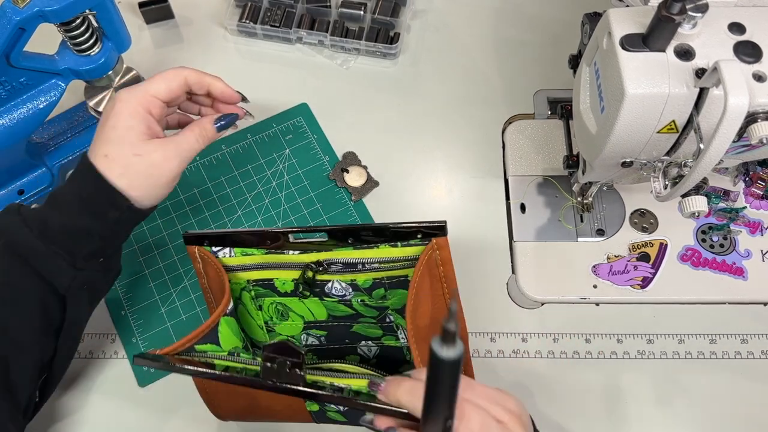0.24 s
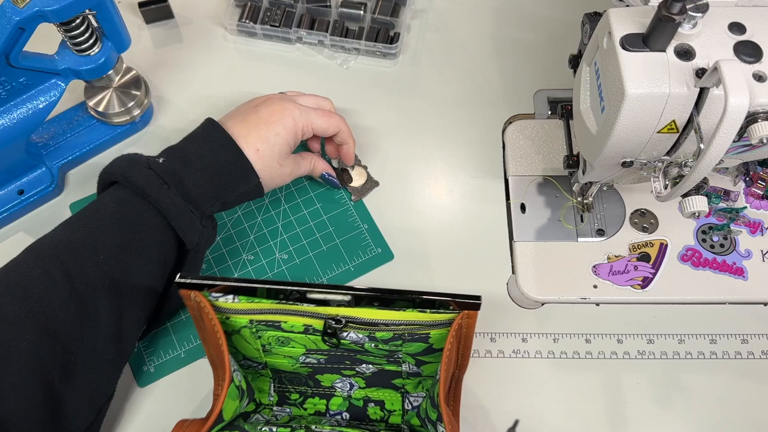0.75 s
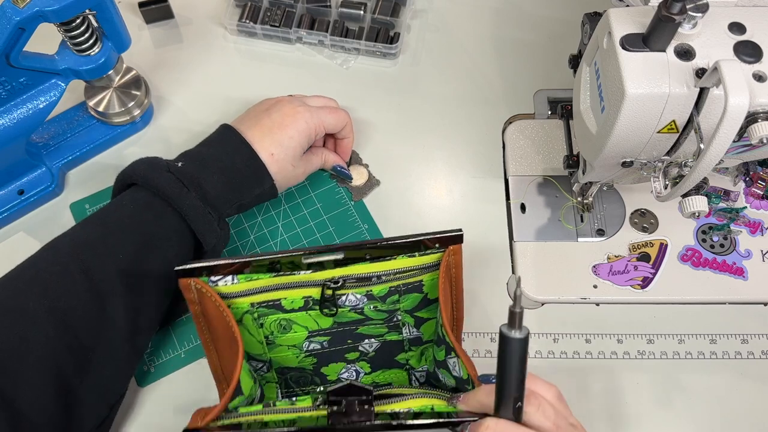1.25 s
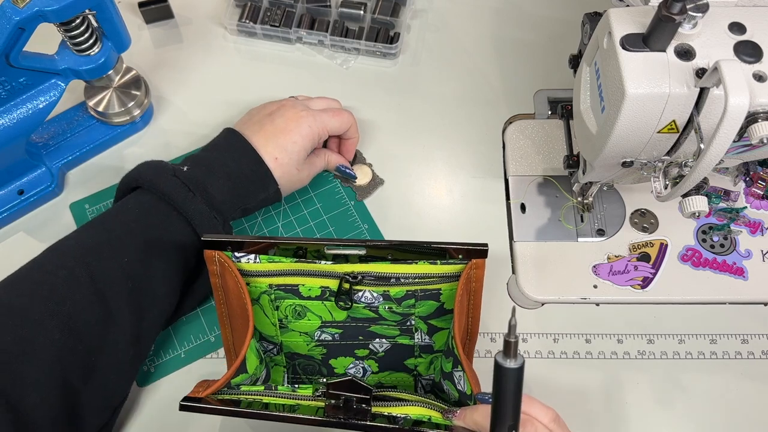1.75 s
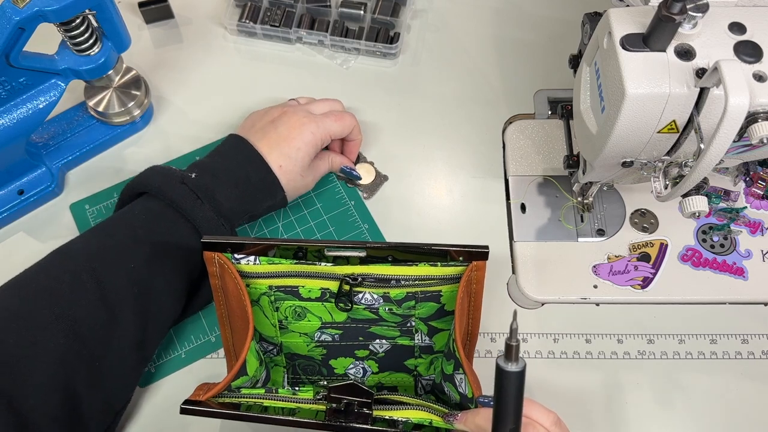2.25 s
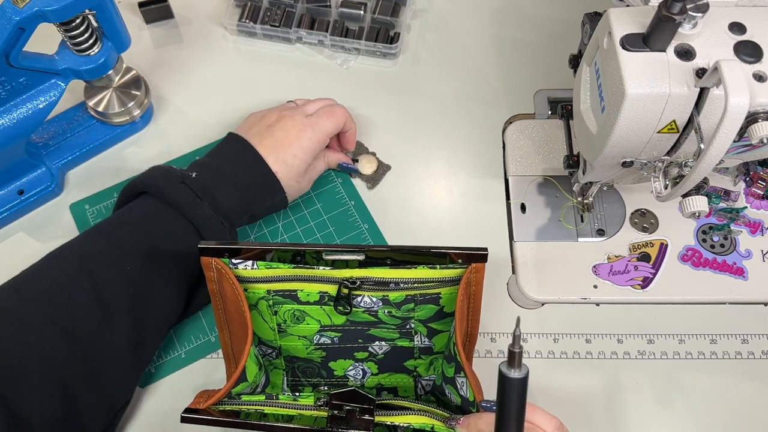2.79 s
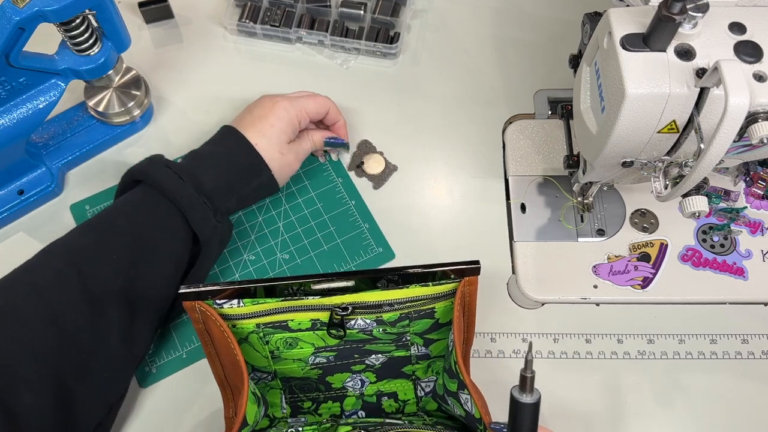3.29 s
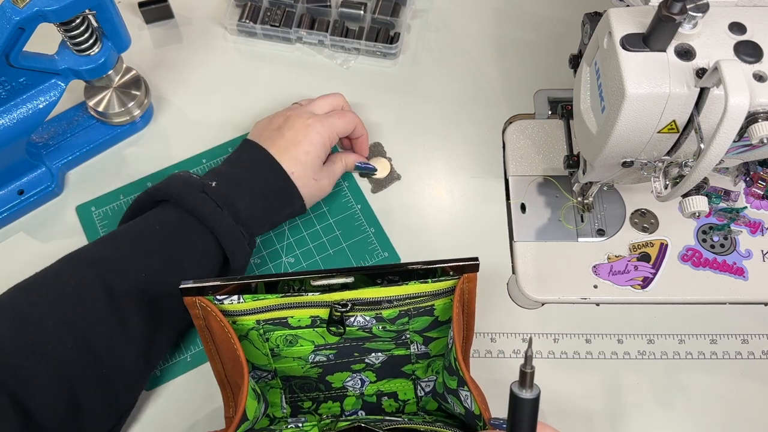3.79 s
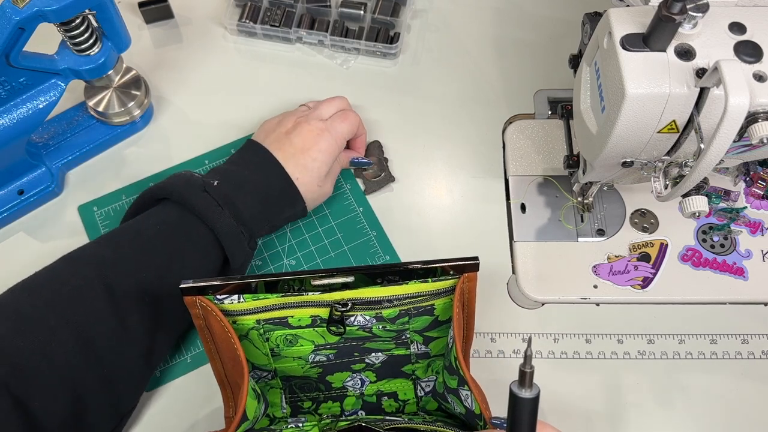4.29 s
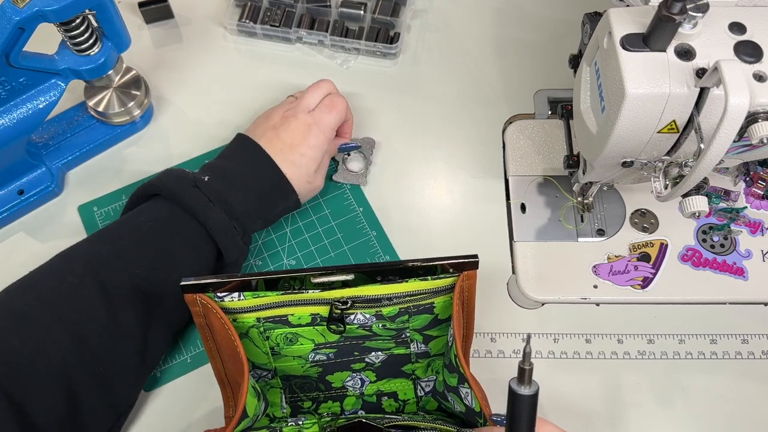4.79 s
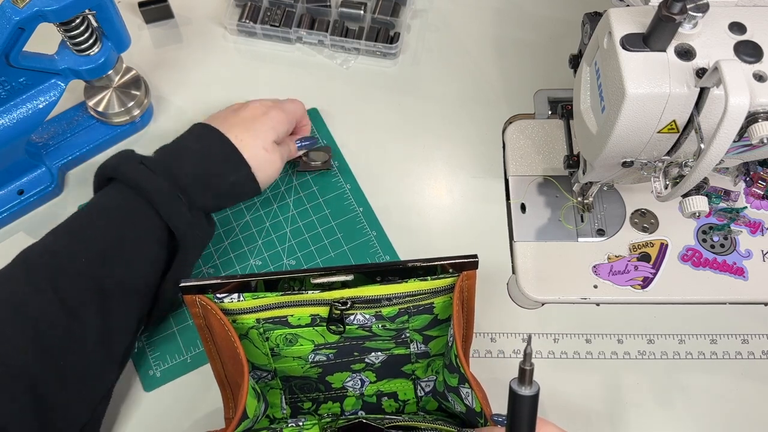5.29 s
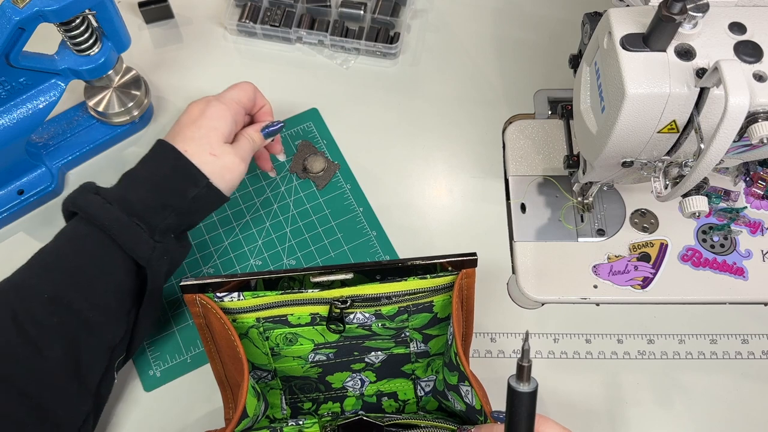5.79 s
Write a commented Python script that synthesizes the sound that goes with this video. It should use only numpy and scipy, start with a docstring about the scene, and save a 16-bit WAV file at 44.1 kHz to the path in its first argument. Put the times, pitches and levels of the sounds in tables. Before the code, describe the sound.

Sparse metallic clicks, tiny squeaks and soft cloth brushing at a table in a quiet, faintly humming room, then a sharp cluster of clacks.

```python
"""In a small room, at a work table, a hand holds a screwdriver against a bag's metal frame; the other pries a plate.
Metal snaps down, bounces, rings briefly and ends in a loud clatter: shaped noise bursts plus fading sine waves.
Nails tick (light bursts), scrape (narrow noise in small slips) and squeak (gliding tones); low noise thuds dully.
A sleeve brushes the cutting mat as swelling noise; the room answers with a short noise tail.
Behind it all lie soft air noise and a faint hum of unsteady sine waves."""
import sys
import numpy as np
from scipy import signal
from scipy.fft import rfft, irfft, next_fast_len
from scipy.io import wavfile
from scipy.ndimage import uniform_filter1d, map_coordinates

SR = 44100
rng = np.random.default_rng(int(sys.argv[2]) if len(sys.argv) > 2 else 0)


def inscribe(sig):
    """Save sig as 16-bit PCM at rate SR to the path in sys.argv[1].

    A 1-D sig is mono; a 2-D sig holds one channel per row.
    Samples are clipped to [-1, 1] before scaling.
    """
    pcm = np.round(np.clip(np.atleast_2d(sig).T, -1, 1) * 32767)
    wavfile.write(sys.argv[1], SR, pcm.astype(np.int16))


N = 266364  # length of the scene [samples]


def amp(db):
    """Turn decibels into a factor for the wave."""
    return 10 ** (np.asarray(db) / 20)


def unit(x):
    """Scale to an average strength (rms) of 1."""
    return x / np.sqrt(np.mean(x ** 2) + 1e-20)


def along(points, hz):
    """Read a curve of (frequency, value) points, spaced by pitch as the ear hears it."""
    point_hz, value = np.transpose(points)
    return np.interp(np.log(hz + 1), np.log(point_hz + 1), value)


def wobble(rate):
    """A smooth random curve with `rate` random points a second."""
    points = rng.standard_normal(int(N * rate / SR) + 4)
    return map_coordinates(points, [np.arange(N) * rate / SR])


def filtered(x, response):
    """Make each frequency stronger or weaker, or shift its phase."""
    n = x.shape[-1]
    padded = next_fast_len(n + 4096)
    spectrum = rfft(x, padded) * response(np.fft.rfftfreq(padded, 1 / SR))
    return irfft(spectrum, padded)[..., :n]


def causal(gain):
    """Turn a gain curve into the filter that reacts soonest, with nothing before the blow (minimum phase)."""
    cepstrum = irfft(np.log(np.maximum(gain, 1e-6)))
    half = len(cepstrum) // 2
    cepstrum[1:half] *= 2
    cepstrum[half + 1:] = 0
    return irfft(np.exp(rfft(cepstrum)))


def add(track, s, x):
    """Mix a sound into the track at time s."""
    i = max(round(s * SR), 0)
    track[..., i:i + x.shape[-1]] += x[..., :max(N - i, 0)]


def narrow(n, hz, width):
    """Noise of rms 1 gathered around one pitch."""
    return unit(filtered(rng.standard_normal(n), lambda f: 1 / (1 + (np.log((f + 1) / hz) / width) ** 2)))


def modes(rows, t, weights_db):
    """Objects ring as a sum of fading sine waves, each with its own strength."""
    hz, db, t60 = np.transpose(rows)[:, :, None]
    phase = rng.uniform(0, 2 * np.pi, hz.shape)
    fade = amp(db + weights_db[:, None] - 60 * t / t60)
    return np.sum(fade * np.sin(2 * np.pi * hz * t + phase), 0)


# Small metal piece, damped by the fingers:
# (frequency [Hz], relative level [dB], time to fade by 60 dB [s], spot that excites it most [0-2])
METAL_RING = [(5670, 5.5, 0.022, 0.18), (5800, 3.5, .027, 0), (7280, 5, 0.026, 1.32),
              (10600, 2, 0.038, 1.66)]
# Metal snaps down on the table; small trims follow:
# (time [s], level [dB], pitch [Hz], hardness [dB], time to fade by 60 dB [s], metal ring re snap level [dB],
#  spot struck [0-2], time to first bounce [s; 2.5 ms or less: no bounce], loss per bounce [dB])
METAL_SNAPS = [(0.9385, -28, 3730, -13.5, 0.02, -15, 1.3, .0072, 4.5),
               (1.4385, -30, 3500, -16, 0.039, -10, 1.4, 0.01, 3),
               (2.043, -37.5, 4007, -21, 0.032, -18, 1.6, 0, 0),
               (2.2797, -37.5, 1760, -25.5, 0.043, -13, 1, 0.0009, 0),
               (2.6504, -34, 1335, -14, 0.014, -9, .3, 0.0041, 6),
               (2.9985, -22, 3780, -15.5, .02, 0, 0.26, .0033, 2),
               (4.4338, -25.5, 3300, -21.5, 0.019, -5, 2, 0, 0),
               (4.5906, -25.5, 4015, -17, 0.014, -6, 1.4, 0.00008, 0),
               (4.611, -29, 3230, -28, 0.028, -25, 1.2, 0, 0),
               (4.6347, -34, 3480, -23, .01, -3, 1.2, 0.0057, 16),
               (5.4423, -34, 1714, -2, 0.023, 6.5, 2, .003, 4),
               (5.4741, -31.5, 1300, -18, 0.03, -22, 1, 0.00059, 0),
               (5.5106, -25.5, 1800, -27.5, .024, -19, .3, 0.00093, 4),
               (5.5385, -18, 3075, -23.5, .024, -11.5, .3, 0.00074, 0),
               (5.5481, -20.5, 4660, -4, 0.018, 5.5, 0, 0.00021, 0),
               (5.557, -24.5, 2082, -18.5, .026, -17.5, 0, .0135, 11),
               (5.604, -26.5, 2090, -12, 0.024, -8, .2, .005, 5.5)]
BOUNCE_SHRINK = 0.77  # each flight over the one before
BOUNCE_DULL_DB, BOUNCE_DAMP_DB = 1.5, 3  # each bounce is softer in touch and rings less


def snaps(click_db=-0.5, spot_db=14, count=3):
    """Landing metal wakes the table and rings by the spot struck; bounces come ever sooner and softer."""
    out, t = np.zeros((2, N)), np.arange(2 ** 14) / SR
    metal, best_spots = np.array(METAL_RING)[:, :-1], np.array(METAL_RING)[:, -1]
    attack = 1 - np.exp(-t / 0.00011)
    for s, db, pitch_hz, hardness_db, t60, ring_db, spot, flight, loss_db in METAL_SNAPS:
        # The farther from its best spot, the weaker a mode rings.
        miss = np.minimum(np.abs(best_spots - spot), 2)
        add(out, s, amp(db) * table(t, pitch_hz))
        for k in range(count if flight > .0025 else 1):
            blow_db = db - k * loss_db
            ring_gain = amp(blow_db + ring_db - k * BOUNCE_DAMP_DB)
            ring = ring_gain * modes(metal, t, -spot_db * miss) * attack
            add(out, s, contact(t, blow_db + click_db, pitch_hz, hardness_db - k * BOUNCE_DULL_DB, t60))
            add(out, s, in_room(ring, wet_db=-17))
            s = s + flight * BOUNCE_SHRINK ** k
    return out


# A low-pitched contact knocks the table harder: (pitch [Hz], knock re click [dB])
KNOCK_BY_PITCH = [(1300, 2), (2000, -10), (4200, -10.5)]
EDGE_DB, EDGE_SHARE = 3, 0.63  # hardness is the sizzle level; the edge band follows this share of it


def contact(t, db, pitch_hz, hardness_db, t60, weight_db=0):
    """Pitch and hardness set the colour of a blow, which clacks in the room."""
    knock_db = along(KNOCK_BY_PITCH, pitch_hz) + weight_db
    edge_db = EDGE_DB + EDGE_SHARE * hardness_db
    bands_db = db + np.array([knock_db, 0, edge_db, hardness_db])
    return in_room(clack(t, bands_db, pitch_hz, t60), wet_db=-12.5)


# Knock, click, edge and sizzle bands of a contact: (low edge [Hz], high edge [Hz])
CONTACT_BANDS = [(200, 1200), (1200, 4500), (4500, 9000), (9000, 16000)]
# Starting colour of a contact on the table top: (frequency [Hz], relative level [dB])
CONTACT_COLOUR = [(60, -34.5), (200, -18.5), (420, -7), (1100, -3), (2100, -1.5), (4100, -2.5), (4900, -4),
                  (6400, -8), (7700, -5), (10000, -7), (11700, -9.5), (13500, -11.5), (16000, -16.5)]
# Damped table-top resonances in every contact: (frequency [Hz], width [Hz], boost [dB])
PLATE_PEAKS = [(452, 64, 5), (816, 220, 1.5), (1550, 110, 0), (1963, 100, 5), (2260, 150, 4.5),
               (3293, 260, 5.5), (4040, 170, 4)]


def clack(t, levels_db, pitch_hz, t60, pitch_db=5, pitch_width=0.18, snap_db=4, snap_t60=0.0033,
          near_db=-18, near_t60=0.089):
    """One contact: a sharp snap, dense damped table modes, then scatter from things near by."""
    snap = amp(snap_db - 60 * t / snap_t60)
    body = amp(-60 * t / t60)
    scatter = amp(near_db - 60 * t / near_t60)
    fade = np.sqrt(snap ** 2 + body ** 2 + scatter ** 2)
    burst = rfft(rng.standard_normal(len(t)) * fade)
    hz = np.fft.rfftfreq(len(t), 1 / SR)
    # A short blow feeds all pitches evenly; the table top gives the colour.
    lumps = np.sqrt(np.abs(uniform_filter1d(np.abs(burst) ** 2, size=180)))
    peaks_db = sum(db / (1 + (2 * (hz - centre) / width) ** 2) for centre, width, db in PLATE_PEAKS)
    # The grip of the fingers sets one broad resonance of its own.
    peaks_db = peaks_db + pitch_db / (1 + (np.log((hz + 1) / pitch_hz) / pitch_width) ** 2)
    gain = amp(along(CONTACT_COLOUR, hz) + peaks_db) / lumps
    # The hardness of the contact shares its energy (over 5 ms) among the bands; two rounds bring it close.
    wanted = amp(levels_db) ** 2 * .005 * SR * len(t) / 2
    centres_hz = np.sqrt(np.prod(CONTACT_BANDS, 1))
    for _ in range(2):
        power = np.abs(burst * gain) ** 2
        held = np.array([np.sum(power[(hz > lo) & (hz < hi)]) for lo, hi in CONTACT_BANDS])
        correction_db = 10 * np.log10(wanted / held)
        gain = gain * amp(along(np.c_[centres_hz, correction_db], hz))
    return irfft(burst * rfft(causal(gain)))


# Lingering resonances of table and room:
# (frequency [Hz], relative level [dB], time to fade by 60 dB [s])
TABLE_RING = [(116, -11, .25), (297, -6, .45), (436, 1, .39), (614, -6, .27), (684, -4, .36), (867, 4, .22),
              (1071, -.5, .34), (1312, 3, .3), (1400, -6.5, .22), (1595, 6, .26), (1781, 0, .25),
              (1931, 0, .3), (1997, 5, .22), (2100, 3, .2), (2464, 5, .28), (2909, 1, .2), (3016, 3, .22),
              (4029, 3, .14)]


def table(t, pitch_hz, table_db=-33):
    """The table lingers after a blow; its low resonances follow the knock."""
    low_db = 0.39 * along(KNOCK_BY_PITCH, pitch_hz) + 9.7
    push_db = along([(600, low_db), (2000, 0)], np.transpose(TABLE_RING)[0])
    chance_db = rng.standard_normal(len(TABLE_RING))
    attack = 1 - np.exp(-t / 0.00011)
    return amp(table_db) * modes(TABLE_RING, t, push_db + chance_db) * attack


# Nails and the screwdriver tip tick lightly; small trims follow:
# (time [s], level [dB], pitch [Hz], hardness [dB], time to fade by 60 dB [s])
LIGHT_TICKS = [(.281, -48.5, 4500, -3, 0.067), (0.2976, -44.5, 4630, -0.5, 0.03),
               (0.4745, -55.5, 1300, -2, 0.053), (0.504, -54, 4400, 3, 0.027),
               (.5897, -51, 2400, -14, 0.0066), (0.6793, -46.5, 3000, -16, 0.0098),
               (.684, -44.5, 2030, -17, 0.019), (1.0345, -50, 4050, -13, 0.0095),
               (1.7002, -56, 1320, -10, 0.1), (1.8944, -58, 1856, -11, 0.017),
               (2.618, -51.5, 3250, -23, 0.035), (2.7303, -46.5, 3310, -27, 0.026),
               (2.7453, -52.5, 1900, -22.5, .04), (2.8936, -39.5, 1870, -21.5, 0.077),
               (2.963, -47, 1500, -7, 0.048), (2.981, -41, 3320, -3, 0.036),
               (3.6843, -56.5, 1550, -22, 0.038), (3.8054, -56, 1660, -10, .027),
               (3.895, -57, 3000, 2, 0.014), (4.1109, -44.5, 2440, -28.5, 0.021),
               (4.6082, -41.5, 2053, -21, 0.0098), (4.8846, -45.5, 1440, -16, 0.024),
               (5.5075, -39.5, 1500, -16, 0.026), (5.5956, -35, 3920, -27, 0.011)]
TICK_KNOCK_DB = 5  # the finger behind a tick adds weight


def ticks(click_db=-0.5, table_db=1):
    """Light contacts stir the table but are too weak to ring the metal."""
    out, t = np.zeros((2, N)), np.arange(2 ** 14) / SR
    for s, db, pitch_hz, hardness_db, t60 in LIGHT_TICKS:
        add(out, s, contact(t, db + click_db, pitch_hz, hardness_db, t60, TICK_KNOCK_DB))
        add(out, s, amp(db + table_db) * table(t, pitch_hz))
    return out


# Bumps on the table and the low body of some metal blows:
# (time [s], level [dB], centre frequency [Hz], time to fade by 60 dB [s])
DULL_THUDS = [(0.137, -48.5, 970, 0.024), (0.4745, -36.5, 486, 0.02), (.479, -49, 125, 0.14),
              (0.6186, -46, 327, 0.061), (.877, -46, 655, 0.073), (1.067, -51.5, 627, 0.058),
              (1.426, -50, 600, 0.042), (2.044, -40.5, 820, 0.049), (2.877, -45, 816, 0.048),
              (3.684, -50.5, 596, 0.048), (4.076, -52, 637, .025), (5.442, -39.5, 150.2, 0.036),
              (5.4735, -27, 674, .04)]


def dull_thuds():
    """Dull low thuds: bumps on the table and the low body of some metal blows."""
    out, t = np.zeros((2, N)), np.arange(SR // 4) / SR
    for s, db, hz, t60 in DULL_THUDS:
        add(out, s, in_room(amp(db) * thud(t, hz, t60), wet_db=-14.5))
    return out


def thud(t, hz, t60):
    """A dull blow: noise around one pitch, rising quickly and fading."""
    fade = amp(-60 * t / t60) * (1 - np.exp(-t / 0.00035))
    return unit(narrow(len(t), hz, width=0.29) * fade) * np.sqrt(np.mean(fade ** 2))


# Nails and fingertips sliding:
# (time [s], length [s], level [dB], pitch [Hz], relative width [log-frequency])
NAIL_SCRAPES = [(.278, 0.02, -49.5, 7800, 0.087), (1.598, 0.37, -70, 850, 0.15),
                (2.162, 0.03, -63.5, 6200, 0.41), (2.206, 0.042, -55, 750, 0.34),
                (2.223, 0.032, -57.5, 1660, 0.45), (2.931, 0.01, -48.5, 1150, 0.51),
                (2.96, .03, -45.5, 1193, 0.56), (3.678, 0.127, -67.5, 1510, .8),
                (5.185, .12, -61.5, 5400, 0.29), (5.415, 0.03, -61.5, 6000, .6)]


def scrapes(slip_hz=450, rough_db=3.0):
    """A nail or fingertip slides in uneven little slips."""
    out = np.zeros((2, N))
    for s, length, db, hz, width in NAIL_SCRAPES:
        n = int(length * SR)
        slips = amp(rough_db * wobble(slip_hz)[:n])
        stroke = unit(narrow(n, hz, width) * slips * signal.windows.tukey(n, .5))
        add(out, s, in_room(amp(db) * stroke, wet_db=-10))
    return out


# A nail grips and squeaks; a taper to silence at the end is added to the fade:
# (time [s], level [dB], first pitch [Hz], last pitch [Hz], time to fade by 60 dB [s], length [s])
NAIL_SQUEAKS = [(.59, -31, 2400, 2400, .026, .013), (.589, -38, 1650, 1500, .03, .012),
                (.6203, -37, 1520, 1490, .045, .011), (.63, -48, 1520, 1420, .34, .053),
                (.629, -55, 2650, 3250, .8, .06), (.684, -37, 1500, 1500, .046, .007),
                (3.935, -66.5, 2500, 2820, 3, .12)]


def squeaks(jitter=0.084, octave_db=-16):
    """Stick and slip at an unsteady pitch, starting at once and fading."""
    out = np.zeros((2, N))
    for s, db, first_hz, last_hz, t60, length in NAIL_SQUEAKS:
        t = np.arange(int(length * SR)) / SR
        unsteady = 1 + jitter * narrow(len(t), hz=300, width=0.38)
        hz = np.linspace(first_hz, last_hz, len(t)) * unsteady
        phase = 2 * np.pi * np.cumsum(hz) / SR
        fade = amp(db - 60 * t / t60) * np.sqrt(1 - t / length)
        tone = np.sin(phase) + amp(octave_db) * np.sin(2 * phase)
        add(out, s, in_room(fade * tone, wet_db=-25))
    return out


# Colour of the cloth's light swish: (frequency [Hz], relative level [dB])
SWISH_COLOUR = [(800, -27), (1500, -11), (2800, -0.5), (4500, 1.5), (6000, -4), (9000, -9), (14500, -19),
                (16000, -47)]
# Colour of the lower, pressed rub: (frequency [Hz], relative level [dB])
RUB_COLOUR = [(300, -8), (600, -5.5), (1000, -11), (1700, -9.5), (3000, -19.5), (6000, -33.5)]
# Strokes of the sleeve over the mat, before trims:
# (start time [s], end time [s], swish level [dB], rub re swish level [dB])
SLEEVE_STROKES = [(-.05, 0.29, -64.5, -5.5), (0.49, 1.067, -59, -0.5), (1.093, 1.38, -63, -5.5),
                  (1.538, 2.352, -72.5, 4.5), (2.803, 3.2, -70, -11), (3.65, 4.7, -71, 3.5),
                  (5.023, 5.653, -65.5, -8.5)]
STROKE_FADE_S = 0.19  # a stroke swells and dies in this time
RESTING_DB = -72.5  # constant swish under the strokes, before the trim


def sleeve(swish_db=-1, rub_db=-3, grain_db=1):
    """Cloth brushes over the mat in strokes; pressing down adds a lower rub."""
    t = np.arange(N) / SR
    swish_power, rub_power = np.full(N, amp(RESTING_DB) ** 2), np.zeros(N)
    for start, end, db, press_db in SLEEVE_STROKES:
        motion = np.clip(.5 + np.minimum(t - start, end - t) / STROKE_FADE_S, 0, 1)
        swish_power += (amp(db) * motion) ** 2
        rub_power += (amp(db + press_db) * motion) ** 2
    high = amp(swish_db) * np.sqrt(swish_power) * noise(SWISH_COLOUR)
    low = amp(rub_db) * np.sqrt(rub_power) * noise(RUB_COLOUR)
    return (high + low) * amp(grain_db * wobble(60))


def noise(spectrum):
    """Coloured stereo noise of rms 1, nearly mono in the lows and wide in the treble."""
    pair = filtered(rng.standard_normal((2, N)), lambda hz: amp(along(spectrum, hz)))
    return unit(diffuse(pair))


# Colour of the air noise: (frequency [Hz], relative level [dB])
AIR_COLOUR = [(20, 0), (45, -2), (70, -2.5), (150, -6), (300, -0.5), (500, -10), (1000, -12), (2000, -16),
              (4500, -14), (7000, -17), (10000, -21.5), (14500, -26), (16000, -36.5)]
# Tones of the hum, around which each level wavers: (frequency [Hz], level [dB])
HUM_TONES = [(302, -82), (387.6, -75), (475, -81.5), (775, -90), (861, -84.5), (1249, -86), (2476, -90.5),
             (6250, -88.5)]


def room_tone(air_db=-68, hum_db=0):
    """Soft air noise and a hum whose tones waver slightly in level and phase."""
    t = np.arange(N) / SR
    hum = np.zeros(N)
    for hz, db in HUM_TONES:
        level = amp(db + 1.5 * wobble(5.3)) * np.sqrt(2)  # the root turns rms into peak
        hum += level * np.sin(2 * np.pi * hz * t + .5 * wobble(2.4))
    return amp(air_db) * noise(AIR_COLOUR) + amp(hum_db) * hum


# How long the room tail lasts: (frequency [Hz], time to fade by 60 dB [s])
ROOM_FADE = [(100, .42), (500, 0.24), (1500, 0.3), (3500, 0.24), (7000, 0.22), (14000, 0.12)]
# Colour of what the walls send back: (frequency [Hz], relative level [dB])
WALL_COLOUR = [(100, -5.5), (500, 3.5), (2500, -1.5), (4500, -2.5), (8000, -4), (15000, -2.5)]


def in_room(x, wet_db, build=0.0055):
    """Many small reflections act like a fading noise tail, which builds up over `build` seconds."""
    hz, t, z = signal.stft(rng.standard_normal((2, SR // 2)), SR, nperseg=256)
    decay_db = along(WALL_COLOUR, hz)[:, None] - 60 * t / along(ROOM_FADE, hz)[:, None]
    tail = diffuse(signal.istft(z * amp(decay_db), SR, nperseg=256)[1])
    tail = tail * (1 - np.exp(-(np.arange(tail.shape[1]) / SR / build) ** 2))
    wet = amp(wet_db) * signal.fftconvolve(x[None], tail / np.linalg.norm(tail[0]), axes=1)
    wet[:, :len(x)] += x  # the direct sound
    return wet


# Chosen stereo width: (frequency [Hz], side re middle level [dB])
STEREO_WIDTH = [(20, -56.5), (1000, -54.5), (2000, -45.5), (3500, -50), (6000, -17), (14000, -5)]


def diffuse(pair):
    """Chosen stereo width for two noises: nearly mono below about 4 kHz, wide in the treble."""
    side = filtered(pair[1], lambda hz: amp(along(STEREO_WIDTH, hz)))
    return np.array([pair[0] + side, pair[0] - side])


# Chosen phase offset between the channels: (frequency [Hz], left ahead of right [radians])
CHANNEL_OFFSET = [(20, 0), (1200, 0.0063), (2500, 0.055), (4000, 0.12), (6000, 0.91), (9000, 1.09),
                  (13000, 2), (16000, 1.9)]


def scene():
    """Left runs slightly ahead of right, hardly at all in the bass, clearly in the treble."""
    sound = snaps() + ticks() + dull_thuds() + scrapes() + squeaks() + sleeve() + room_tone()
    # Half the offset moves left ahead, the other half holds right back.
    return filtered(sound, lambda hz: np.exp(.5j * np.outer([1, -1], along(CHANNEL_OFFSET, hz))))


TOP_HZ = 16000  # band limit, where the level is 3 dB down


def record(dry):
    """The recorder cuts very steeply above its band limit."""
    return filtered(dry, lambda hz: 1 / np.sqrt(1 + (hz / TOP_HZ) ** 120))


dry = scene()
out = record(dry)
inscribe(out)
```